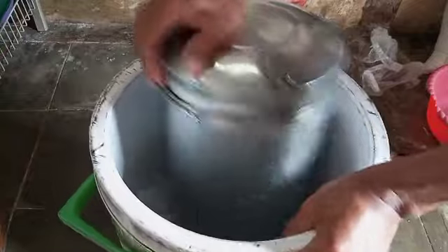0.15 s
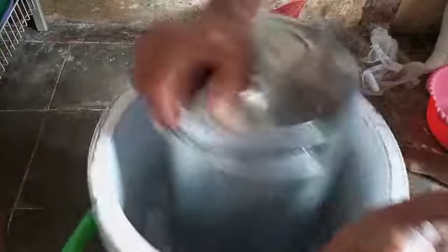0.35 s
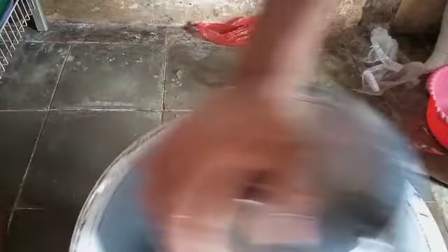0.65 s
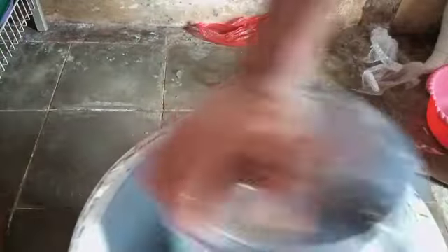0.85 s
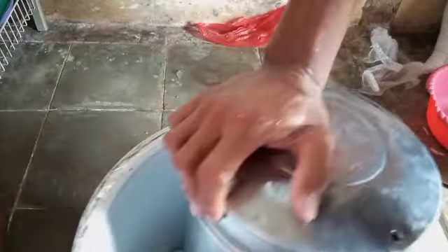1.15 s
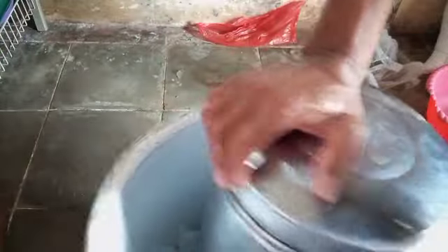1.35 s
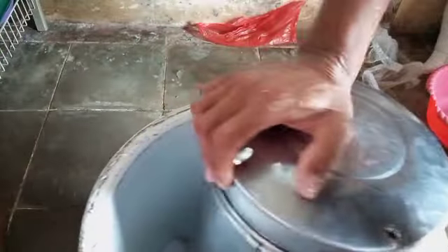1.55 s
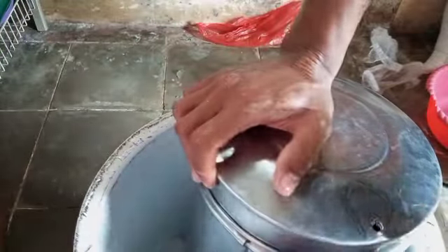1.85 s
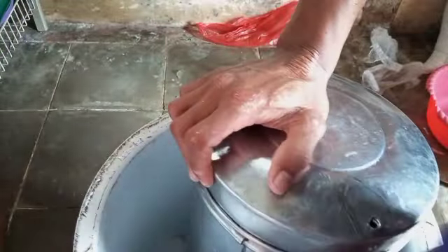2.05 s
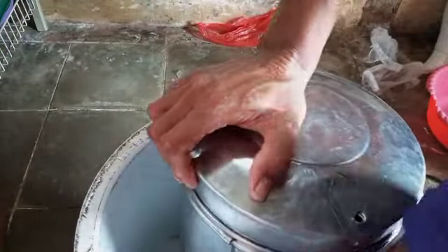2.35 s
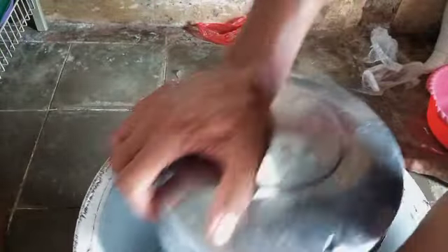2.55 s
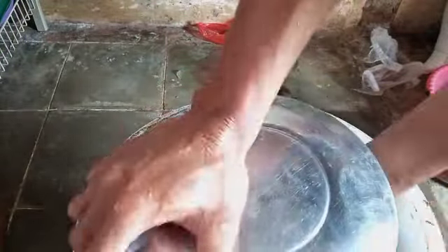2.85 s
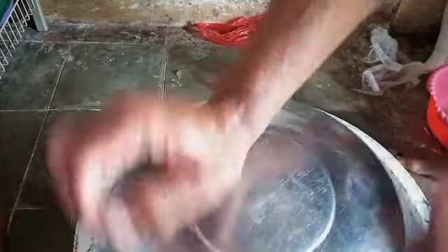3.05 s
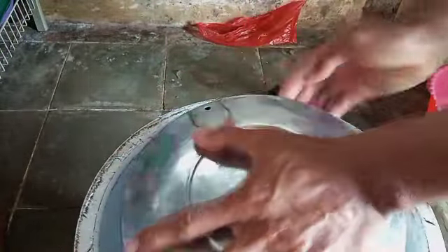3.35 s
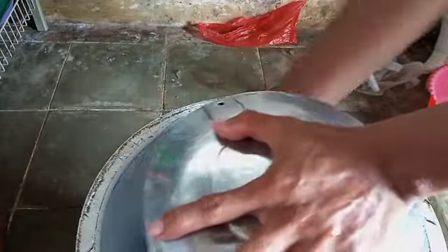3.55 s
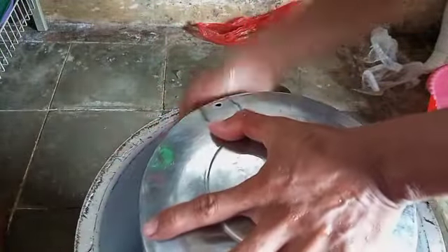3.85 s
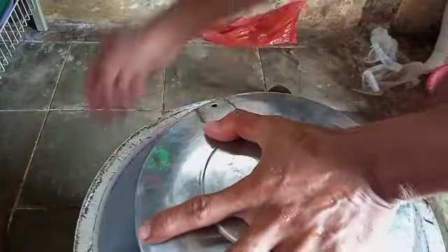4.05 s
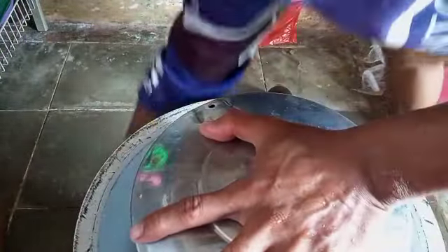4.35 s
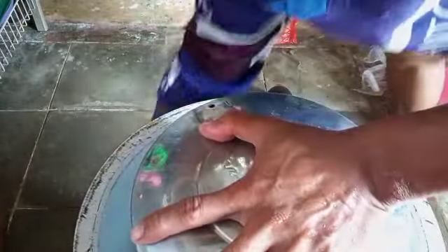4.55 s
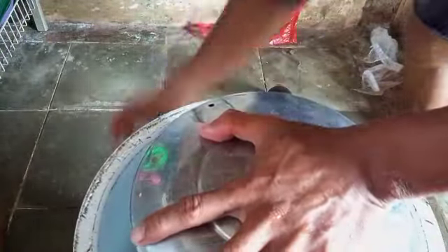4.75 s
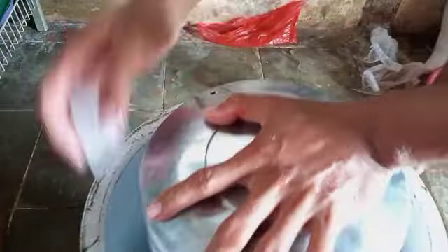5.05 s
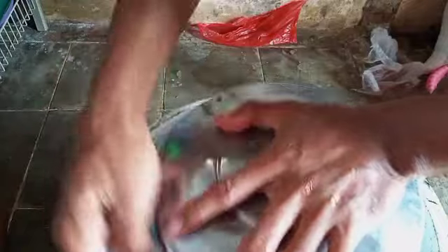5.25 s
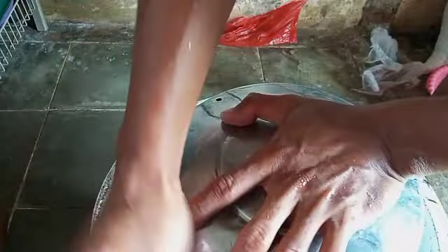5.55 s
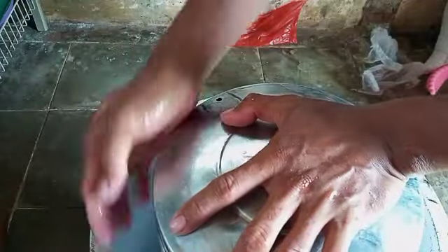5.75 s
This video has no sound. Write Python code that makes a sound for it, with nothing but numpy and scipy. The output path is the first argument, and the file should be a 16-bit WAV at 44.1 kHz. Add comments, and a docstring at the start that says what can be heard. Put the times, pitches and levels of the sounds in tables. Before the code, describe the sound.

Dense icy crunching and dull clattering around a metal can in a tub, with pauses, sharp snaps, and later a few separate ice knocks.

```python
"""Broken ice grinds in dense tiny cracks as a metal canister is shaken and twisted down into a plastic barrel of it;
then lumps of ice are dropped in beside it. Cracks are random impulses shaped by resonances.
Lumps knock on the damped metal as decaying noise, ice snaps in bright bursts, and thumps and squeaks are
damped sines. A small tiled room adds diffuse echoes and a steady hush; a phone microphone colours the ice."""
import sys
import numpy as np
from scipy import signal
from scipy.io import wavfile
from scipy.ndimage import uniform_filter1d

SR = 44100
rng = np.random.default_rng(int(sys.argv[2]) if len(sys.argv) > 2 else 0)


def output_pcm(signal):
    """Save a mono or channel-first signal as 16-bit PCM at the path in sys.argv[1].

    Samples are clipped to [-1, 1] before scaling.
    """
    pcm = np.clip(np.atleast_2d(signal).T, -1, 1) * 32767
    wavfile.write(sys.argv[1], SR, np.round(pcm).astype(np.int16))


N = 260625
HZ = np.fft.rfftfreq(4096, 1 / SR)  # frequency grid of every spectrum


def gain_of(db):
    """Amplitude ratio of a level: 20 dB for each factor of ten."""
    return 10 ** (np.asarray(db) / 20)


def evened(x):
    """Normalisation to unit root-mean-square amplitude."""
    return x / np.sqrt(np.mean(x ** 2) + 1e-20)


def read(points, hz):
    """Interpolation on a logarithmic frequency axis."""
    f, value = np.transpose(points)
    return np.interp(np.log(hz + 1), np.log(f + 1), value)


def add(mix, s, sound):
    """Linear superposition: the sound is summed into the mix from time s."""
    part = mix[round(s * SR):][:len(sound)]
    part += sound[:len(part)]


def causal(db):
    """Minimum phase: the impulse response of spectrum db over HZ, with its energy as early as possible."""
    log = np.log(gain_of(np.maximum(db, -100)))
    full = np.concatenate([log, log[-2:0:-1]])
    return np.fft.ifft(np.exp(np.conj(signal.hilbert(full)))).real[:2048]


def ring(hz, t60, s):
    """Free damped oscillation: a sine that decays by 60 dB in t60."""
    t = np.arange(round(s * SR)) / SR
    return gain_of(-60 * t / t60) * np.sin(2 * np.pi * hz * t)


def treble(split_hz=2525.0):
    """Crossover: the share 0-1 of each frequency that belongs to the part above split_hz."""
    return 1 / (1 + (split_hz / (HZ + 1)) ** 4)


def cracks(count, per_s, spread_db, hiss):
    """Shot noise: sparse random clicks of very uneven size over a wash of hiss."""
    hit = rng.random(count) < per_s / SR
    size = np.minimum(rng.exponential(1, count), 4)
    sign = rng.choice([-1., 1.], count)
    wash = rng.standard_normal(count)
    clicks = hit * sign * gain_of(spread_db * size)
    return evened(evened(clicks) + hiss * wash)


def clinks(x, ring_db, cycles, count=14):
    """Modal excitation: each crack also rings one lump of ice or damped patch of metal at its own pitch."""
    lump = np.repeat(rng.integers(0, count, len(x) // 70 + 1), 70)[:len(x)]
    pitches = np.geomspace(650., 6500., count) * rng.uniform(0.963, 0.996, count)
    out = np.zeros(len(x))
    for k, hz in enumerate(pitches):
        tone = ring(hz, cycles / hz, .04)
        tone = tone / np.linalg.norm(tone) * (1000 / hz) ** 0.32  # higher pitches ring more weakly
        out += signal.oaconvolve(x * (lump == k), tone)[:len(x)]
    return x + gain_of(ring_db) * out


# Ice grinding, before the swell of the strokes:
# [t/s, dull cracks level/dB, sharp cracks level/dB, barrel wall level/dB]
GRINDING_LEVELS = [(0.0, -28, -31.5, -39.5), (0.87, -30, -32.5, -32), (1.13, -39, -43, -44.5),
                   (1.35, -44.5, -48, -45), (1.56, -29, -37, -31.5), (1.69, -45, -50.5, -43),
                   (1.91, -70, -64.5, -75), (2.16, -52, -64, -60), (2.34, -21, -22, -40.5),
                   (2.72, -27, -29, -36), (2.93, -25.5, -30, -46), (3.19, -36.5, -44, -55),
                   (3.41, -53, -54, -58), (3.62, -34.5, -42.5, -40), (3.77, -25.5, -37.5, -42),
                   (3.98, -35, -44, -43.5), (4.26, -43, -48, -50), (4.64, -62, -69, -78),
                   (5.25, -53.5, -62.5, -53), (5.4, -51.5, -53.5, -48), (5.61, -60.5, -72, -72),
                   (5.91, -59.5, -59, -59.5)]
# The canister is first worked up and down; each stroke swells the grinding
SHAKE_FIRST_S, SHAKE_PERIOD_S, SHAKE_END_S, SHAKE_DB = 0.085, 0.0947, 1.07, 6


def grind_db(t):
    """Periodic level modulation: dull cracks, sharp cracks and barrel wall swell with each stroke."""
    s, *columns = np.transpose(GRINDING_LEVELS)
    stroke = (1 + np.cos(2 * np.pi * (t - SHAKE_FIRST_S) / SHAKE_PERIOD_S)) / 2
    stroke = stroke * (t < SHAKE_END_S)
    return [np.interp(t, s, c) + SHAKE_DB * stroke for c in columns]


# Spectrum of the cracks as the microphone colours them: [f/Hz, density level/dB per Hz]
ICE_COLOUR = [(180, -17.5), (300, -12.5), (385, -11.5), (462, -5), (565, -10.5), (814, -1), (1140, -1),
              (1530, 1), (2170, -5.5), (5520, -14.5), (7820, -22), (10700, -16.5), (16000, -44.5)]
# Modes of the barrel wall: [f/Hz, t60/s, level/dB]
BARREL_MODES = [(123, 0.03, -101), (226, 0.058, -3.5), (338, 0.037, -13.5), (476, 0.07, -34)]


def grinding():
    """Stick-slip: dull and sharp cracks come in random jerks; separate, steadier cracks ring the wall's modes."""
    dull_db, sharp_db, wall_db = grind_db(np.arange(N) / SR)
    slow_noise = uniform_filter1d(uniform_filter1d(rng.standard_normal(N), 300), 300)
    jerk = gain_of(2.2 * evened(slow_noise))

    shared = clinks(cracks(N, 2000., 3.85, 0.98), -15.5, 17.2)
    extra = cracks(N, 1000., 7.1, 1.0)  # heard in the sharp part only
    dull_colour = causal(read(ICE_COLOUR, HZ) + 20 * np.log10(1 - treble() + 1e-5))
    sharp_colour = causal(read(ICE_COLOUR, HZ) + 20 * np.log10(treble() + 1e-5))
    dull = signal.oaconvolve(shared, dull_colour)[:N]
    sharp = signal.oaconvolve(shared + 1.1 * extra, sharp_colour)[:N]

    modes = sum(gain_of(db) * ring(hz, t60, .12) for hz, t60, db in BARREL_MODES)
    wall = signal.oaconvolve(cracks(N, 300., 3.1, 0.18), modes)[:N]
    ice = gain_of(dull_db) * evened(jerk * dull) + gain_of(sharp_db) * evened(jerk * sharp)
    return ice + gain_of(wall_db) * evened(wall)


RISE_SHARE = 0.028  # a knock swells for this share of its crumble time


def knock(db, hz, sharp_db, hollow_db, t60):
    """Source and filter: dying cracks pass the ice colour, this lump's resonance and the canister's hollow."""
    t = np.arange(5000) / SR
    fade_db = -60 * t / t60
    drive = clinks(cracks(len(t), 2000., 2.44, 0.64), -13.0, 9.3, count=5)
    drive *= np.minimum(t / (RISE_SHARE * t60), 1)
    colour_db = read(ICE_COLOUR, HZ) + 10.1 / (1 + ((HZ - hz) / (0.064 * hz)) ** 2)
    hollow_share = 1 - treble(638.0)
    dull_share = 1 - treble() - hollow_share
    early = round(SR * min(t60, .1) / 8) + 80  # samples that set the level
    parts = []
    # the hollow part dies a little faster than the dull one, the sharp part a little slower
    for share, speed in ((dull_share, 1), (treble(), .9), (hollow_share, 1.1)):
        colour = causal(colour_db + 20 * np.log10(abs(share) + 1e-5))
        part = signal.oaconvolve(drive * gain_of(speed * fade_db), colour)
        parts.append(part / np.sqrt(np.mean(part[:early] ** 2)))
    dull, sharp, hollow = parts
    crest_db = 12.5  # the early dull part is set this far under the nominal peak
    return gain_of(db - crest_db) * (dull + gain_of(sharp_db) * sharp + gain_of(hollow_db) * hollow)


SMALL_COUNT, SMALL_T60_S = 60, 0.11
SMALL_DB, SMALL_SHARP_DB = 7.5, 3.0  # peak and sharpness over the grinding's
SMALL_SPREAD_DB = 2.5  # scale of the random excess in peak level


def small_knocks():
    """Random point process: small knocks scattered by chance, following the grinding's level and sharpness."""
    when, size, pitch = rng.random((SMALL_COUNT, 3)).T
    s = when * (N - 1) / SR
    dull_db, sharp_db, _ = grind_db(s)
    db = dull_db + SMALL_DB - SMALL_SPREAD_DB * np.log(size + 0.0013)
    hz = 857.0 * 2.2 ** pitch
    return list(zip(s, db, hz, SMALL_SHARP_DB + sharp_db - dull_db, SMALL_T60_S + 0 * s))


# Lumps knocking and crunching:
# [t/s, nominal peak level/dB, lump resonance f/Hz, sharp part over dull level/dB, crumble t60/s]
LUMP_KNOCKS = [(0.071, -5, 1700, -16, 0.052), (0.151, -4.5, 861, -4, 0.13), (0.179, -8.5, 1140, -6.5, 0.15),
               (0.243, -10.5, 1450, -5.5, 0.21), (0.278, -5, 1580, -9, 0.063),
               (0.354, -19, 1570, -16, 0.13), (0.369, -7.5, 1510, -1.5, 0.12),
               (0.45, -8.5, 1500, -6, 0.078), (0.465, -6, 1210, -5, 0.16), (0.527, -10, 1480, 2, 0.075),
               (0.547, -9.5, 1680, 3.5, 0.1), (0.574, -6, 1500, -4, 0.08), (0.637, -23, 1480, -24, 0.18),
               (0.658, -5.5, 1400, -4, 0.12), (0.721, -5.5, 815, -5.5, 0.15), (0.733, -9, 1520, -1.5, 0.12),
               (0.841, -9.5, 1420, -5.5, 0.12), (0.859, -12, 915, 3, 0.18), (0.923, -9.5, 1460, -1.5, 0.33),
               (0.973, -18, 860, 3.5, 0.14), (1.006, -7, 1510, -4, 0.16), (1.029, -13, 950, -2, 0.097),
               (1.117, -16.5, 1970, -5.5, 0.065), (1.131, -15, 958, -10, 0.057),
               (1.192, -23, 824, -6.5, 0.093), (1.227, -22, 840, -7, 0.051), (1.238, -23, 864, 2.5, 0.041),
               (1.366, -20.5, 1500, 1, 0.13), (1.449, -15.5, 1680, -6.5, 0.33),
               (1.472, -10, 1370, -0.5, 0.092), (1.488, -10, 985, -0.5, 0.11), (1.569, -8, 1500, -3, 0.13),
               (1.594, -14.5, 874, -4, 0.27), (1.675, -18, 1510, -6.5, 0.09), (1.699, -19, 876, -10, 0.055),
               (1.785, -34.5, 860, -24, 0.19), (1.83, -36, 641, -12, 0.14),
               (1.945, -31.5, 1760, -28, 0.037), (2.125, -26.5, 1400, -2.5, 0.079),
               (2.146, -10.5, 1400, -4.5, 0.26), (2.156, -9, 1210, 0.5, 0.33),
               (2.196, -4, 1470, -2.5, 0.32), (2.264, -9, 1510, 2.5, 0.16), (2.321, -10, 1520, -4, 0.081),
               (2.34, -8, 1520, -4, 0.096), (2.365, -9, 1520, -15, 0.17), (2.408, -7.5, 756, -20, 0.12),
               (2.457, -7, 1460, -6.5, 0.26), (2.607, -15, 1460, 6.5, 0.17), (2.689, -9, 1540, -8, 0.11),
               (2.729, -9.5, 1540, -19, 0.037), (2.776, -12.5, 1780, -24, 0.11),
               (2.83, -5.5, 1420, -3, 0.22), (2.865, -7, 800, -8.5, 0.21), (2.922, -6, 1340, -7.5, 0.14),
               (2.966, -22, 1420, 12, 0.063), (3.013, -4.5, 990, -13, 0.15), (3.073, -6, 1320, -14, 0.094),
               (3.129, -22, 1400, -8, 0.095), (3.157, -13, 1260, -19, 0.041), (3.206, -29.5, 1460, 2, 0.11),
               (3.227, -16.5, 1280, -6.5, 0.07), (3.31, -23, 1260, -4.5, 0.061),
               (3.414, -20, 1290, 0, 0.13), (3.559, -28, 1200, -2, 0.051), (3.59, -12.5, 1510, -2.5, 0.15),
               (3.642, -10, 846, -3, 0.069), (3.669, -9, 1230, -8, 0.33), (3.704, -12.5, 824, -6, 0.33),
               (3.756, -15.5, 1360, -2, 0.17), (3.786, -15.5, 1610, 3, 0.14),
               (3.831, -11.5, 1260, -10, 0.07), (3.883, -10.5, 1260, -6.5, 0.069),
               (3.925, -8.5, 1050, -9, 0.075), (3.942, -10.5, 1180, -19.5, 0.056),
               (3.97, -15, 1260, -9.5, 0.15), (3.996, -8.5, 1170, -23, 0.037),
               (4.048, -9, 1680, -10.5, 0.11), (4.064, -10.5, 1000, -12, 0.071), (4.089, -8, 805, -2, 0.15),
               (4.136, -9, 1140, -4, 0.047), (4.166, -7.5, 1160, -8.5, 0.074), (4.24, -22, 935, 1, 0.043),
               (4.288, -34, 1560, 11, 0.037), (4.314, -31.5, 1250, 0, 0.078), (4.373, -32, 1580, 3, 0.18),
               (4.416, -26, 1390, -7, 0.33), (4.449, -27, 964, 1.5, 0.16), (4.817, -42.5, 1470, -1, 0.16),
               (4.887, -37, 1390, -0.5, 0.23), (4.928, -37, 1470, 3.5, 0.29),
               (5.014, -31, 1550, -10, 0.044), (5.197, -7, 648, -8, 0.064), (5.206, -5, 970, -9.5, 0.06),
               (5.228, -24, 1100, -9, 0.26), (5.322, -19, 1110, -5.5, 0.087),
               (5.334, -16, 1220, -9.5, 0.11), (5.459, -29.5, 816, -14, 0.039),
               (5.504, -12, 1470, -11, 0.24), (5.514, -6.5, 1410, -28, 0.079),
               (5.549, -15.5, 1280, -15, 0.17), (5.775, -9.5, 1630, -1.5, 0.072), (5.786, -7, 970, -4, 0.1),
               (5.794, -18, 1150, -12, 0.17), (5.857, -23.5, 1240, -7.5, 0.14)]
HOLLOW_DB = -5  # hollow part of a knock, over the barrel's share of the grinding at that moment


def knocks():
    """Impact excitation: each lump strikes once, with a hollow part that follows the barrel's share."""
    out = np.zeros(N)
    for s, db, hz, sharp_db, t60 in LUMP_KNOCKS + small_knocks():
        dull_db, _, wall_db = grind_db(s)
        add(out, s, knock(db, hz, sharp_db, HOLLOW_DB + wall_db - dull_db, t60))
    return out


def snap(db, hz):
    """Brittle fracture: milliseconds of bright noise, strongest near the pitch of the splinter."""
    t = np.arange(700) / SR
    burst = rng.standard_normal(len(t)) * gain_of(-60 * t / 0.011)
    burst[0] += 4.5  # the break itself
    ring_db = 12.5 / (1 + ((HZ - hz) / (.1 * hz)) ** 2)
    bright_db = 20 * np.log10(treble(770.0) + 1e-5)
    colour = causal(0.81 * read(ICE_COLOUR, HZ) + ring_db + bright_db)
    burst = signal.oaconvolve(burst, colour)[:len(t)]
    return gain_of(db) * burst / abs(burst).max()


# Sharp snaps of splitting ice: [t/s, peak level/dB, resonance f/Hz]
ICE_SNAPS = [(0.0463, -8, 3060), (0.0727, -12, 3540), (0.136, -6, 3130), (0.2253, -7, 3200),
             (0.2788, -5, 3740), (0.529, -12, 3960), (0.66, -17, 2660), (0.724, -14, 2700),
             (0.763, -15, 2750), (0.841, -10, 3940), (0.8619, -22, 2640), (0.922, -3, 2720),
             (1.238, -25, 3970), (1.286, -27.5, 3220), (1.3653, -17, 2500), (1.568, -14, 3130),
             (1.9454, -26.5, 2350), (2.0413, -22, 3300), (2.2682, -7, 4000), (2.339, -15, 3030),
             (2.6898, -5.5, 2250), (2.7286, -3.5, 2560), (2.778, -24, 2410), (2.8662, -2, 3100),
             (2.919, -21, 3000), (3.0125, -12, 2370), (3.2066, -24, 3500), (3.264, -19, 4970),
             (3.4144, -11.5, 2770), (3.5907, -4, 3870), (3.641, -24, 3780), (3.7059, -4, 3000),
             (3.7562, -6, 4390), (3.7864, -11.5, 3000), (3.8825, -3.5, 4270), (3.9954, -10.5, 3200),
             (4.087, -14, 2330), (4.1659, -12, 2630), (4.288, -35, 3570), (4.3485, -25, 3820),
             (4.428, -22.5, 5940), (5.1995, -9.5, 3050), (5.46, -28.5, 3080), (5.5144, -8.5, 2820),
             (5.7014, -35.5, 2770), (5.7749, -8.5, 2830)]


def snaps():
    """Superposition of separate fractures, each at its own time."""
    out = np.zeros(N)
    for s, db, hz in ICE_SNAPS:
        add(out, s, snap(db, hz))
    return out


def struck(table, rise_s, wobble):
    """Damped resonance: single rings with a soft start and an unsteady level."""
    out = np.zeros(N)
    for s, db, hz, t60 in table:
        tone = ring(hz, t60, 1.0)
        tone *= 1 - np.exp(-np.arange(len(tone)) / SR / rise_s)
        tone *= 1 + wobble * evened(uniform_filter1d(rng.standard_normal(len(tone)), 150))
        add(out, s, gain_of(db) * tone / abs(tone).max())
    return out


# Barrel thumps: [t/s, peak level/dB, f/Hz, canister's ring relative to that peak level/dB]
BARREL_THUMPS = [(0.047, -8.5, 183, -13.5), (0.072, -14, 231, -7), (0.094, -16.5, 241, -7),
                 (0.149, -14, 234, -10), (0.257, -28, 174, -13), (0.364, -8.5, 210, -12),
                 (0.39, -16, 231, -11), (0.464, -19.5, 250, -14), (0.642, -18, 169, -8),
                 (0.716, -16, 216, -5), (0.844, -14.5, 283, -8), (1.489, -17, 192, -17),
                 (2.54, -17, 190, -17), (2.683, -17.5, 255, -0.5), (2.724, -17, 255, 0),
                 (2.774, -17, 297, 1), (2.843, -24, 204, 4), (3.398, -25, 134, -16),
                 (3.417, -16.5, 135, -12), (3.435, -23.5, 135, -16), (5.196, -24.5, 242, -14),
                 (5.32, -12.5, 209, -22)]
THUMP_CYCLES = 10.8  # swings until a thump has died by 60 dB
CANISTER_HZ, CANISTER_T60_S = 467, 0.035  # the canister's lowest mode


def thumps():
    """Constant-Q decay: a thump lasts a fixed count of swings, and also rings the canister's lowest mode."""
    barrel = [(s, db, hz, THUMP_CYCLES / hz) for s, db, hz, _ in BARREL_THUMPS]
    canister = [(s, db + ring_db, CANISTER_HZ, CANISTER_T60_S) for s, db, _, ring_db in BARREL_THUMPS]
    return struck(barrel + canister, 0.0035, 0.4)


# Squeaks of ice on metal: [t/s, peak level/dB, f/Hz, t60/s]
METAL_SQUEAKS = [(0.7941, -19, 13600, 0.015), (1.617, -15.5, 10450, 0.017), (2.3705, -27, 11900, 0.05),
                 (3.7853, -7, 10660, 0.02)]


def squeaks():
    """Frictional squeal: ice on metal gives brief high tones of very unsteady level."""
    return struck(METAL_SQUEAKS, 0.00082, 0.95)


# Reverberation time of the room: [f/Hz, t60/s]
ROOM_DECAY = [(150, 0.23), (400, 0.35), (1000, 0.36), (3000, 0.26), (9000, 0.094)]


def room(x):
    """Diffuse reverberation: sparse echoes of random sign, each band decaying at its own rate."""
    taps = np.zeros(SR // 2)
    at = np.arange(120, len(taps) - 20, 20)
    taps[at + rng.integers(0, 20, len(at))] = rng.choice([-1., 1.], len(at))
    hz, t, z = signal.stft(taps, SR, nperseg=256)
    decay = gain_of(-60 * t / read(ROOM_DECAY, hz)[:, None])
    tail = signal.istft(z * decay, SR, nperseg=256)[1]
    return signal.fftconvolve(x, tail / np.linalg.norm(tail))[:N]


# Spectrum of the room hush, relative: [f/Hz, density level/dB per Hz]
HUSH_COLOUR = [(18, -32), (30, -12), (145, 13), (499, 1.5), (684, 6), (1280, -17.5), (1630, -12),
               (2480, -12), (8080, -33), (10200, -7), (14400, -32), (16000, -31)]
HUSH_DB = -59  # RMS level


def hush():
    """Stationary coloured noise: the steady hush of the room."""
    noise = signal.oaconvolve(rng.standard_normal(N), causal(read(HUSH_COLOUR, HZ)))[:N]
    return gain_of(HUSH_DB) * evened(noise)


def scene():
    """Linear superposition of the near sources, their reverberation and the hush."""
    near = grinding() + knocks() + snaps() + thumps() + squeaks()
    # below about 95 Hz the near sounds fall away, while the hush keeps its deep bass
    near = signal.sosfilt(signal.butter(3, 95., "high", fs=SR, output="sos"), near)
    return (near + gain_of(-15.5) * room(near) + hush())[None]


EDGE_HZ = 15900  # upper band limit


def record(dry):
    """Saturation and band limiting: the input rounds off the highest peaks, then a low-pass filter acts."""
    soft = .95 * np.tanh(dry / .95)
    low_pass = signal.firwin(511, EDGE_HZ, window=("kaiser", 9), fs=SR)
    return signal.oaconvolve(soft, low_pass[None], "same")


dry = scene()
out = record(dry)
output_pcm(out)
```